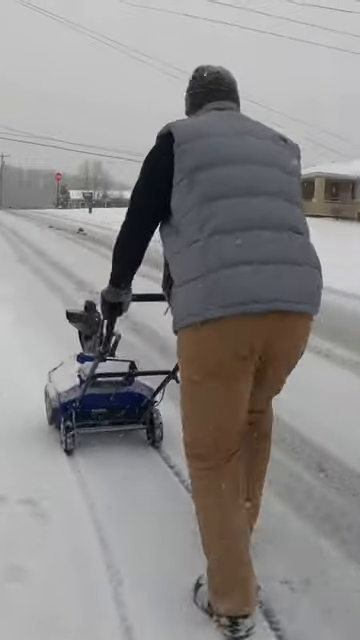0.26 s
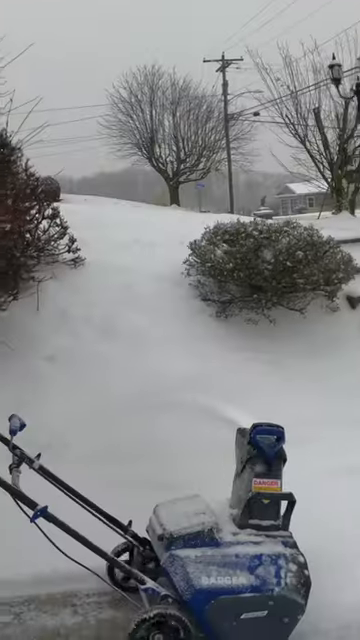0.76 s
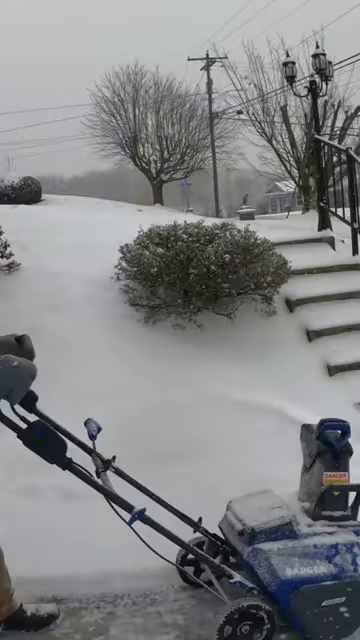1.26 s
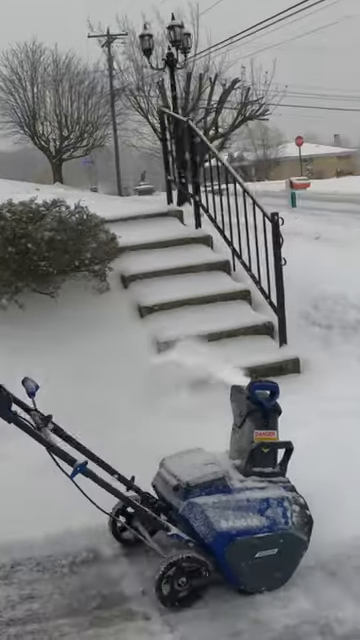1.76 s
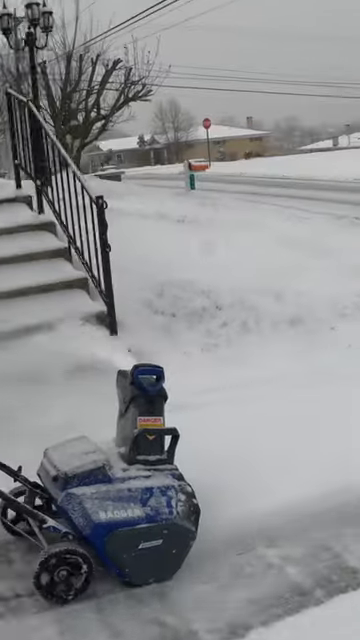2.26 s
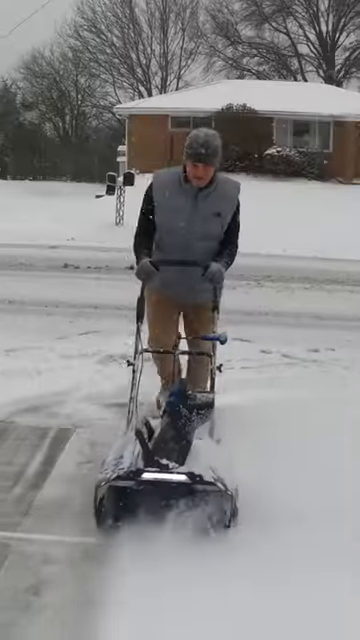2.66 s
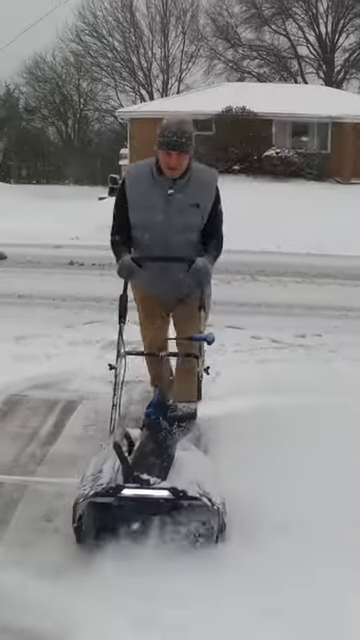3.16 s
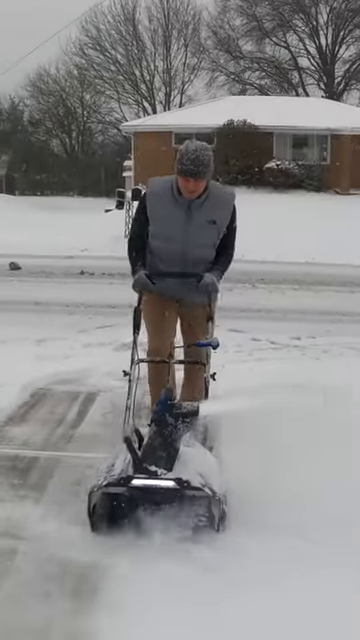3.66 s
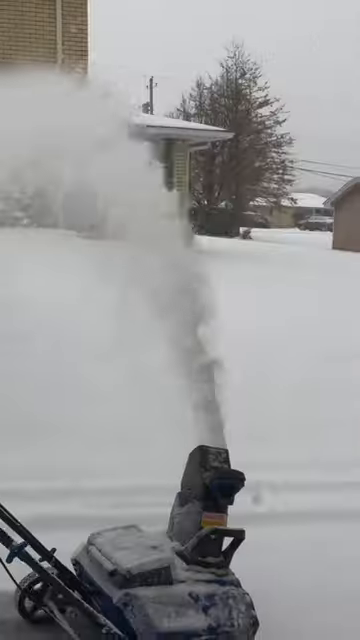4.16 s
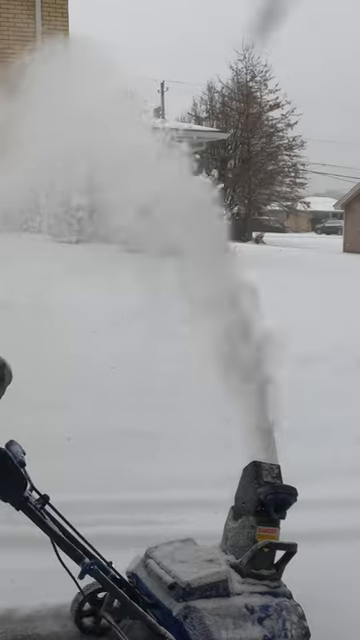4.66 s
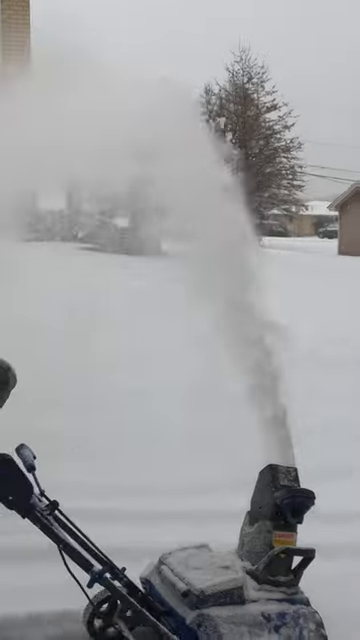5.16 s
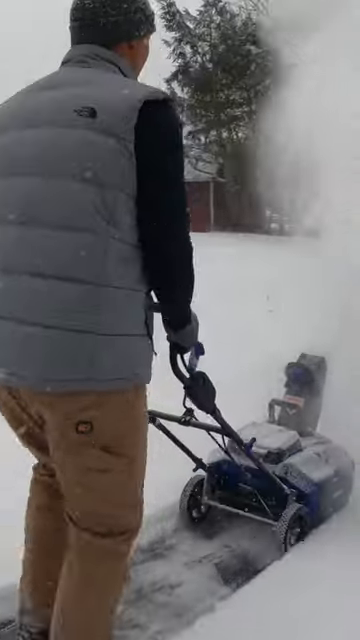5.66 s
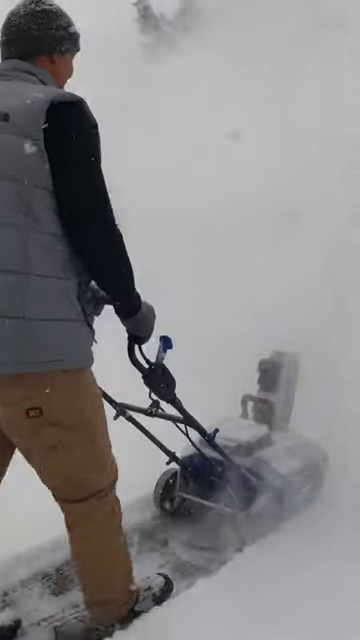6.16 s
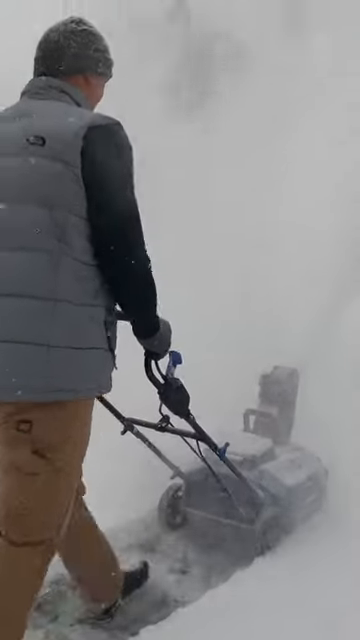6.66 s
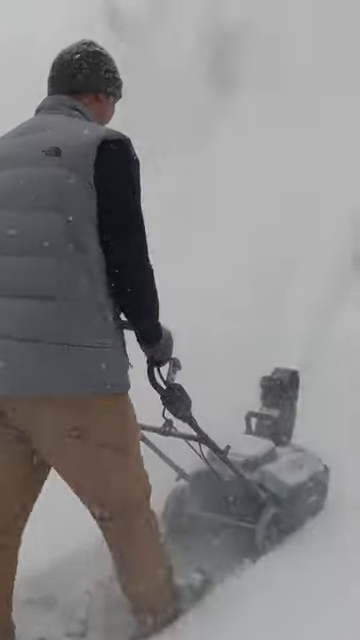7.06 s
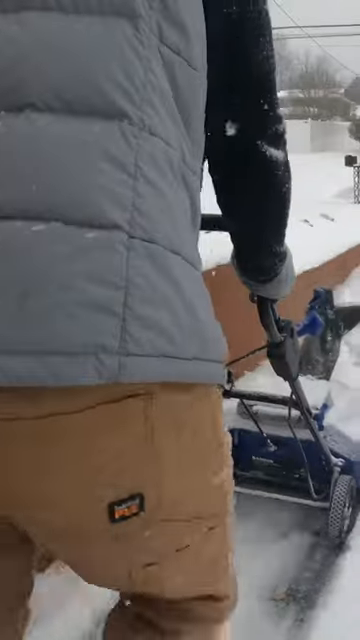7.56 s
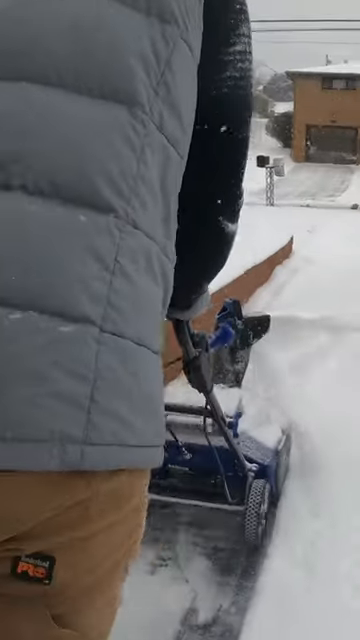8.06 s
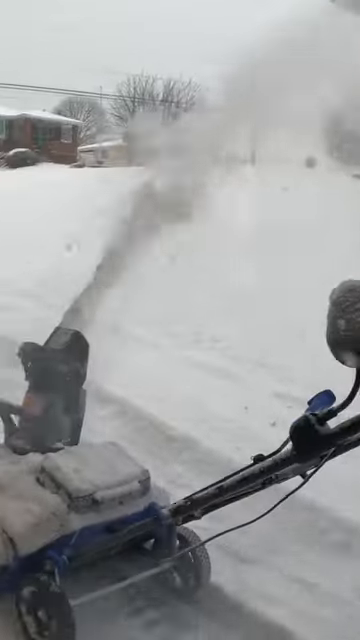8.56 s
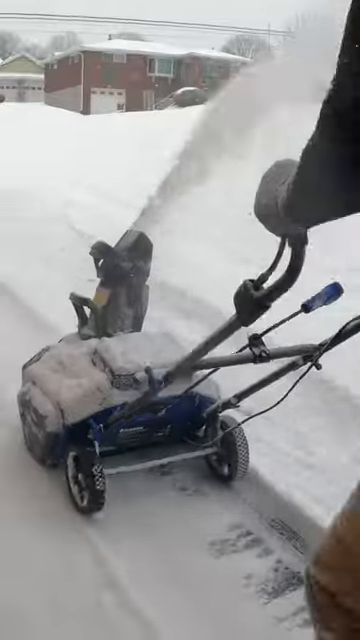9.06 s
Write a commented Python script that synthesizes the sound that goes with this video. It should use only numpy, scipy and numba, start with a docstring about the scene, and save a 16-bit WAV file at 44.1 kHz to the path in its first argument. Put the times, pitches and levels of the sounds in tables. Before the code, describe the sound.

Outdoors, close to the machine, an unpowered snow blower first rolls with gritty crunching and loose metallic clatter. After half a second its electric motor is suddenly running: a high whine, humming paddles and a broad roar of thrown snow. Scraper squeals, ice rattles and gurgles come and go. The tone jumps at each cut, with tiny dropouts.

```python
"""A snow blower with its motor off crunches and clatters along the road, then runs in seven more viewpoints.
The motor whines on shaft orders, belt-driven paddles beat and hum, and snow roars in flickering noise bands.
Blade squeals glide, clods and flecks ring through band-passes, and lumps of snow gurgle in the chute.
Each viewpoint fades in, and the sound drops out five times. Both channels are the same."""
import sys
import numpy as np
from scipy import signal
from scipy.fft import rfft, irfft, next_fast_len
from scipy.io import wavfile
from scipy.ndimage import uniform_filter1d
from numba import njit

SR = 44100
rng = np.random.default_rng(int(sys.argv[2]) if len(sys.argv) > 2 else 0)


def store_wav(level_fs):
    """Save 16-bit WAV to argv[1]."""
    pcm = np.round(np.clip(np.atleast_2d(level_fs), -1, 1) * 32767)
    wavfile.write(sys.argv[1], SR, pcm.T.astype(np.int16))


N = 411110


def undb(db):
    """Gain of a level in dB."""
    return 10 ** (np.asarray(db) / 20)


def unit(x):
    """Scale to rms 1."""
    return x / np.sqrt(np.mean(x ** 2))


def add(out, start_s, sound):
    """Mix a short sound into out from start_s."""
    out[int(start_s * SR):][:len(sound)] += sound


def columns(rows):
    """Curve rows joined by straight lines, one value a sample."""
    s, *values = np.transpose(rows)
    return [np.interp(np.arange(N) / SR, s, v) for v in values]


def walk(rate, size=N):
    """Random levels held 1 / rate s and slewed twice; spread near 1."""
    hold = max(int(SR / rate), 1)
    steps = np.repeat(rng.standard_normal(size // hold + 1), hold)
    return 1.2 * uniform_filter1d(uniform_filter1d(steps, hold), hold)[:size]


@njit
def svf(x, hz, width):
    """State-variable band-pass with a moving centre, gain 1 there."""
    y, b, l = np.empty(len(x)), 0., 0.
    for i in range(len(x)):
        g, k = np.tan(np.pi * hz[i] / SR), width / hz[i]
        v = (b + g * (x[i] - l)) / (1 + g * (g + k))
        b, l, y[i] = 2 * v - b, l + 2 * g * v, k * v
    return y


def steep(x, hz, width):
    """Three fixed band-passes in a row."""
    hz = np.full(len(x), 1. * hz)
    return svf(svf(svf(x, hz, width), hz, width), hz, width)


def band_noise(hz, width):
    """Noise through two band-passes that follow hz, rms 1."""
    return unit(svf(svf(rng.standard_normal(len(hz)), hz, 1. * width), hz, 1. * width))


def orders(turns, table, waver_db, rate):
    """Sines on multiples of a rotation, each wavering alone; rms 1 at 0 dB before the waver."""
    out = 0
    for multiple, db in table:
        level = np.sqrt(2) * undb(db + waver_db * walk(rate))
        out = out + level * np.sin(2 * np.pi * (multiple * turns + rng.random()))
    return out


def resonance_db(hz, peaks):
    """Gain of a tone at hz: 0 dB on top of the nearest resonance, falling away from it."""
    return np.max([-20 * np.log10(1 + (2 * (hz - centre_hz) / width_hz) ** 2)
                   for centre_hz, width_hz in peaks], axis=0)


# viewpoints, the first with the motor off: (start_s, fade_in_s)
VIEWS = [(0, .002), (.505, .03), (2.410, .03), (4.188, .03), (5.354, .03), (7.122, .01), (8.188, .03),
         (9.271, .03)]


def by_view(rows):
    """Curves that jump where the viewpoint changes; zero in the first view."""
    rows = np.array(rows)
    out = np.zeros((len(rows[0]) - 1, N))
    for start, _ in VIEWS[1:]:
        stop = min([s for s, _ in VIEWS if s > start] + [N / SR])
        inside = rows[(rows[:, 0] >= start) & (rows[:, 0] < stop)]
        out[:, int(start * SR):] = np.array(columns(inside))[:, int(start * SR):]
    return out


def per_view(rows):
    """One steady row for each running view."""
    return by_view([(start, *row) for (start, _), row in zip(VIEWS[1:], rows)])


# motor shaft: (start_s, turns_per_second_hz)
SPEED = [(.535, 259.6), (.7, 253.7), (.92, 261), (1.1, 260), (1.26, 265.4), (1.42, 264.6), (1.664, 274.8),
         (1.75, 262.5), (1.83, 257.6), (1.91, 261), (2.07, 278), (2.15, 278.3), (2.23, 265), (2.31, 259),
         (2.39, 259.2), (2.44, 247.6), (2.6, 246.2), (2.85, 249), (3.05, 247.6), (3.28, 250), (3.4, 261),
         (3.48, 266.5), (3.56, 266.5), (3.61, 260), (3.7, 242), (3.93, 242), (4.0, 238.5), (4.05, 240),
         (4.1, 244.5), (4.168, 250), (4.218, 247.3), (4.32, 247.5), (4.53, 250.8), (4.62, 248.4),
         (4.86, 249.8), (5.015, 247.8), (5.334, 249), (5.384, 237.9), (5.55, 244.2), (5.63, 245.5),
         (5.8, 245.8), (5.95, 248.9), (6.12, 249.8), (6.32, 247.5), (6.54, 250.2), (6.61, 248.9),
         (6.7, 243), (6.775, 242), (6.98, 249.5), (7.1, 249.7), (7.152, 246), (7.27, 244), (7.38, 243),
         (7.42, 240.6), (7.58, 241.8), (7.66, 246.2), (7.83, 243.7), (8.0, 251.3), (8.168, 245.6),
         (8.218, 252.2), (8.3, 249.6), (8.456, 247.4), (8.54, 251.3), (8.59, 246.8), (8.67, 249.8),
         (8.84, 251.2), (8.9, 245.5), (9.015, 250.8), (9.065, 245.6), (9.12, 247.8), (9.251, 250.4),
         (9.3, 253.6)]


def shaft_speed():
    """Shaft speed in Hz, its corners smoothed over a thirtieth of a second."""
    return uniform_filter1d(by_view(SPEED)[0], size=SR // 30)


# groups of motor tones: shaft multiples, then the level_db of each multiple
SLOT_ORDERS = (21, 14, 17, 56)
SLOT_DB = (2, -10, -21, -50)
POLE_ORDERS = (8, 6.76, 7)
POLE_DB = (-1.5, -11.5, -14.5)
SIDE_ORDERS = (9, 8.77)
SIDE_DB = (-4, -5.5)
# housing resonances that make an order sing out: (centre_hz, width_hz)
POLE_PEAKS = [(1980, 180)]
SIDE_PEAKS = [(2245, 42), (2420, 470)]
TENTH_PEAKS = [(2415, 100), (2550, 60)]
SECOND_PEAKS = [(484, 12), (508, 18.4), (548, 34)]
WHISTLE_PEAKS = [(9500, 310), (10125, 120)]
OVERTONE_PEAKS = [(10150, 90), (10470, 83), (11250, 900)]
OVERTONE_DB = -24  # 42nd order against the slot whine, on top of its resonance


def motor(turns, shaft_hz, slot_db, pole_db, side_db, tenth_db, second_db, whistle_db):
    """Whine on shaft orders; all but the slot group swell as they cross a resonance of the housing."""
    side_db = side_db + resonance_db(SIDE_ORDERS[0] * shaft_hz, SIDE_PEAKS)
    pole_db = pole_db + resonance_db(POLE_ORDERS[0] * shaft_hz, POLE_PEAKS)
    groups = [(side_db, zip(SIDE_ORDERS, SIDE_DB)), (pole_db, zip(POLE_ORDERS, POLE_DB))]
    lone = [(10, tenth_db, TENTH_PEAKS), (2, second_db, SECOND_PEAKS),
            (39, whistle_db, WHISTLE_PEAKS), (42, slot_db + OVERTONE_DB, OVERTONE_PEAKS)]
    for multiple, db, peaks in lone:
        groups.append((db + resonance_db(multiple * shaft_hz, peaks), [(multiple, 0)]))
    resonant = sum(undb(db) * orders(turns, table, 2.15, 45) for db, table in groups)
    return resonant + undb(slot_db) * orders(turns, zip(SLOT_ORDERS, SLOT_DB), 2.3, 35)


# multiples of the paddle beat, then the level_db of each
PADDLE_ORDERS = (4, 5, 6, 8, 9, 10, 11)
PADDLE_DB = (2, -13.5, -37, -19.5, -13, -12.5, -13)
BELT_RATIO = 2.6  # shaft turns per paddle beat


def paddles(beats, paddle_db):
    """Hum of the belt-driven paddles: wavering harmonics of their beat."""
    return undb(paddle_db) * orders(beats, zip(PADDLE_ORDERS, PADDLE_DB), 1.8, 9)


# multiples of the paddle beat in the low hum; 2.6 is the shaft itself
HUM_ORDERS = (2, 1.74, 2.6, 3)
# one row a running view: level_db of each hum order against the hiss
HUM_DB = [(-18, -21, -20.5, -13), (-18, -31.5, -15.5, -9), (-23, -28.5, -27, -24), (-30, -32.5, -34, -24.5),
          (-25, -32.5, -24, -14), (-24.5, -33, -25, -17.5), (-27, -33, -27, -26)]
HUM_WAVER_DB, HUM_WAVER_HZ = 2, 7


def hum(beats, reference_db):
    """Low hum on the paddle beat and the shaft, balanced anew in each view."""
    return orders(beats, zip(HUM_ORDERS, reference_db + per_view(HUM_DB)), HUM_WAVER_DB, HUM_WAVER_HZ)


# one curve a viewpoint, colour of the roar and hiss; the last also serves the eighth: (hz, db_per_hz)
COLOURS = [
    [(24, -56), (40, -68), (248, -14.5), (442, 3), (643, -13.5), (959, -6), (1660, -18.5), (3270, -16),
     (4410, -17), (5530, -21), (6580, -24), (8670, -24), (15800, -47)],
    [(130, -34), (180, -26), (260, -9.5), (340, -6.5), (450, -0.5), (700, -9), (820, -15), (1000, -7),
     (1250, -7.5), (1480, -14.5), (3200, -7), (5000, -12), (8000, -18.5), (13300, -39.5), (15800, -71)],
    [(130, -37), (180, -21), (340, 2.5), (450, 3.5), (600, -5.5), (680, -10.5), (750, -17), (830, -6),
     (1000, -2), (1250, -11), (1480, -23.5), (1900, -18.5), (3200, -18.5), (5000, -27.5), (8000, -34.5),
     (13300, -56.5), (15800, -73)],
    [(130, -27), (180, -13), (260, -16), (340, -2), (450, 1), (700, -3.5), (820, 2.5), (1000, -8),
     (1250, -1), (1480, -14), (3200, -8.5), (5000, -12.5), (8000, -17.5), (13300, -35.5), (15800, -52)],
    [(130, -23.5), (180, -19), (260, -5), (340, 5), (450, 8), (700, -8), (820, -1), (1000, 4.5), (1250, -6),
     (1330, -16.5), (1430, -25), (1580, -17), (1800, -16.5), (3200, -17), (5000, -18), (8000, -26),
     (13300, -44.5), (15800, -62)],
    [(130, -26), (180, -21), (340, 6), (450, -2), (700, -7.5), (820, 3), (1000, 2), (1250, -13),
     (1480, -12.5), (3200, -12.5), (5000, -11), (8000, -21.5), (13300, -40), (15800, -55)],
    [(130, -24.5), (180, -17), (340, 4), (450, 1.5), (700, -0.5), (820, 6), (1000, 4), (1250, -7),
     (1480, -14), (3200, -11), (5000, -13), (8000, -22), (13300, -42), (15800, -59)],
]
SPLIT_HZ = 1450  # about where roar and hiss overlap


def roar(low_db, high_db, beats):
    """Air and snow noise in flickering bands, coloured by viewpoint; paddle beats and random surges swell it."""
    surges = walk(14)
    beating = 1 + 0.075 * np.sin(2 * np.pi * beats)
    source = rng.standard_normal(N) * beating * undb(1.3 * walk(300))
    out = np.zeros((2, N))
    edges = [int(s * SR) for s, _ in VIEWS] + [N]
    for a, b, colour in zip(edges, edges[1:], COLOURS + COLOURS[-1:]):
        size = next_fast_len(b - a + 4096)
        octave = np.log2(np.arange(size // 2 + 1) * SR / size + 1)
        hz, db = np.transpose(colour)
        bass_cut_db = 9.8 * np.clip(np.log2(hz[0]) - octave, 0, None)
        shaped = rfft(source[a:b], size) * undb(np.interp(octave, np.log2(hz), db) - bass_cut_db)
        for centre in np.arange(5, 15):
            # overlapping triangles, an octave apart
            weight = np.clip(1 - abs(octave - centre - np.log2(SPLIT_HZ / 1448)), 0, 1)
            band = irfft(shaped * weight, size)[:b - a]
            high = int(centre > 10)
            flicker_db = 1.03 * walk(20.55, size=b - a) + (.7, 1.3)[high] * surges[a:b]
            out[high, a:b] += band * undb(flicker_db)
        out[:, a:b] /= np.sqrt(np.mean(out[:, a:b] ** 2, axis=1, keepdims=True))
    return undb(low_db) * out[0] + undb(high_db) * out[1]


# the scraper catches and squeals: (start_s, length_s, first_pitch_hz, last_pitch_hz, level_db)
SQUEALS = [(.79, 0.048, 3380, 3300, -34), (0.843, 0.056, 3290, 3330, -28.5),
           (0.983, 0.093, 3350, 3310, -34.5), (1.053, .075, 3300, 3410, -27.5),
           (1.21, 0.095, 3350, 3220, -20.5), (1.293, 0.063, 3240, 3350, -22),
           (1.361, .065, 3340, 3400, -27), (1.415, .045, 3390, 3230, -23), (1.647, .04, 3270, 3290, -28),
           (1.738, .03, 3270, 3350, -25), (1.94, 0.044, 3430, 3300, -28), (2.217, 0.037, 3300, 3310, -27),
           (2.29, .04, 3360, 3320, -33), (2.35, 0.085, 3290, 3326, -28.5), (2.465, .08, 3300, 3300, -40),
           (2.586, .13, 3330, 3250, -32), (2.713, 0.18, 3234, 3085, -31), (2.884, .1, 3100, 3170, -30.5),
           (2.981, 0.25, 3150, 3240, -32), (3.448, .12, 3080, 3060, -37), (4.134, .05, 3040, 3050, -33),
           (4.219, 0.21, 3130, 3070, -31), (5.097, 0.23, 3050, 3100, -36), (5.862, 0.072, 3220, 3040, -28),
           (5.96, 0.063, 3065, 3070, -27.5), (6.009, 0.062, 3110, 2990, -28), (6.13, .08, 2980, 3050, -31),
           (6.218, 0.079, 3065, 3126, -25), (6.282, .045, 3160, 3220, -28.5),
           (6.32, 0.108, 3194, 3166, -27), (6.421, 0.072, 3110, 3143, -25.5),
           (6.48, .055, 3115, 2960, -27.5), (6.6, 0.032, 3050, 3190, -27), (6.928, .05, 3140, 3090, -30.5),
           (6.997, .03, 3060, 3030, -34), (8.34, .05, 3030, 3070, -30), (8.39, .04, 3080, 3160, -22),
           (8.43, 0.067, 3170, 3105, -26.5), (8.565, 0.036, 3090, 3210, -23), (8.6, 0.046, 3200, 3045, -35),
           (8.72, .08, 2950, 2950, -35), (8.87, 0.055, 3080, 3250, -37), (8.915, 0.071, 3240, 3070, -29),
           (9.02, 0.036, 3140, 3150, -27), (9.09, .06, 3190, 3130, -31), (9.15, 0.052, 3110, 3060, -26)]
SQUEAL_EDGE_S, CHATTER_WANDER_HZ = 0.0305, 110.5
SQUEAL_AIR_DB, SQUEAL_WIDTH_HZ = -11, 160  # noisy part of a squeal


def squeal(chatter_db, chatter_hz):
    """Stick-slip of the scraper blade: a broken, jumping chatter, and gliding squeals when it catches."""
    t = np.arange(N) / SR
    rough = 1 + 0.00406 * walk(250)
    hz, gain = np.maximum(chatter_hz, 1000), np.zeros(N)
    for s, length, first_hz, last_hz, db in SQUEALS:
        shape = np.clip(np.minimum(t - s, s + length - t) / SQUEAL_EDGE_S + .5, 0, 1)
        level = undb(db) * shape
        # the louder squeal sets the pitch
        hz = np.where(level > gain, np.interp(t, [s, s + length], [first_hz, last_hz]), hz)
        gain = np.maximum(gain, level)
    chatter_turns = np.cumsum((chatter_hz + CHATTER_WANDER_HZ * walk(60)) * rough) / SR
    chatter = orders(chatter_turns, [(1, 0)], 3, 30)
    air = undb(SQUEAL_AIR_DB) * band_noise(hz, SQUEAL_WIDTH_HZ)
    tone = orders(np.cumsum((hz + 14 * walk(30)) * rough) / SR, [(1, -0.74)], 1.9, 50)
    return undb(chatter_db) * chatter + gain * (air + tone)


# jolts of the loose frame; both levels are relative: (start_s, crack_db, knock_db, crack_centre_hz)
CLATTERS = [(.015, -22, -42, 4400), (.044, -9.5, -38, 4450), (0.0482, -12, -31, 5000),
            (0.106, -14.5, -42, 4050), (.146, -19, -37, 5000), (.159, -24, -29, 5400),
            (0.191, -22, -31, 5200), (.2204, -31, -42, 4500), (.23, -26, -38, 4500),
            (.2534, -26, -38, 7500), (.257, -30, -25, 4000), (0.2954, -21, -32, 4250),
            (.3164, -23, -38, 5000), (0.322, -28, -27, 4240), (.341, -1.5, -36, 4300),
            (.3634, -19, -39, 7000), (.377, -6.5, -35, 7500), (0.382, -20, -14, 5500),
            (.405, -19, -42, 8000), (0.41, -5, -31, 4260), (.4254, -21, -36, 7000), (.4375, -15, -34, 8500),
            (0.442, -14, -32, 4200), (.467, -18, -38, 7500), (0.472, -23, -13.5, 4000),
            (.491, -17, -34, 6200), (0.496, -15, -36, 4500), (0.59, -5, -35, 5900),
            (7.2097, -21, -29, 4900)]
# struck resonances: (pitch_hz, level_db, t60_s)
HANDLE = [(3340, 0, 0.011), (3930, 0.5, 0.0066), (4830, -9, 0.009), (5400, -1.5, 0.008), (5950, 3, 0.0075)]
HOUSING = [(430, -7.5, 0.051), (965, 0, 0.025), (686, -4, 0.025)]
# wheel over a ridge: (start_s, level_db, first_pitch_hz, last_pitch_hz, swell_s)
THUMP = (.44, -28, 115, 165, .035)
CRACK_DB, CRACK_WIDTH_HZ, RING_BELOW_HZ = 23.5, 6600, 5200  # level against what strikes the handle
TAIL_DB, TAIL_S = -15, 0.0049  # rustle after each crack


def ring(x, modes):
    """Damped resonances struck by x."""
    out = 0
    for hz, db, t60 in modes:
        pole = np.exp(2j * np.pi * hz / SR - np.log(1000) / (t60 * SR))
        out = out + undb(db) * signal.lfilter([1], [1, -pole], x).imag
    return out


def clatters():
    """Each jolt cracks in its own colour, mostly the duller ring the handle, and knocks the housing; one thump."""
    ticks, knocks, out = np.zeros(N), np.zeros(N), np.zeros(N)
    t = np.arange(SR // 10) / SR
    for s, db, knock_db, hz in CLATTERS:
        contact = rng.standard_normal(len(t))
        decay = np.exp(-t / 0.0015) + undb(TAIL_DB) * np.exp(-t / TAIL_S)
        tick = undb(db - 48.0) * steep(unit(contact * decay), hz, 1. * CRACK_WIDTH_HZ)
        add(out, s, undb(CRACK_DB) * tick)
        add(ticks, s, tick * 2.0 / (1 + (hz / RING_BELOW_HZ) ** 6))
        add(knocks, s, undb(knock_db - 40.0) * unit(contact * np.exp(-t / 0.0032)))
    out += ring(ticks, HANDLE) + ring(knocks, HOUSING)
    s, db, first_hz, last_hz, swell = THUMP
    turns = np.cumsum(np.interp(t, [0, 2 * swell], [first_hz, last_hz])) / SR
    envelope = np.sin(np.pi * np.clip(t / swell / 2, 0, 1)) ** 2
    add(out, s, undb(db) * envelope * np.sin(2 * np.pi * turns))
    return out


# ice clods in the chute, levels before the filters: (start_s, bright_db, low_knock_db)
RATTLES = [(1.9262, -2.5, -16.5), (1.9775, 2.5, -12), (2.0173, -3, -17), (2.035, -2.5, -19),
           (2.89, -12, -4), (3.233, -3.5, -11), (3.251, -1, -15), (3.274, -1.5, -20), (3.3075, -9, -24),
           (3.4756, -15, -24), (3.4947, -12, -20), (3.5152, -15, -26), (3.5517, -12, -16),
           (3.6291, -15, -20), (3.7827, -22, -22), (3.8356, -23, -22), (3.9214, -16, -22), (3.9752, -3, -5),
           (4.0496, -15, -22), (4.07, -9, -22), (4.098, -4, -15), (4.1513, -6, -20), (4.207, -7, -20),
           (4.2594, -3, -14), (4.296, -3, -20), (4.472, -5, -1), (4.776, -24, -15), (4.9176, -2, -19),
           (5.18, -5, -17), (5.2348, -4, -9), (5.8247, 0.5, -14), (5.879, -22, -7), (7.021, -5, -15),
           (7.549, -6, -25), (7.709, -8, -14), (8.0236, -4, -14), (8.154, -13, -8), (8.46, -6, -18),
           (8.64, -10, -22), (8.653, -0.5, -20), (8.798, -11, -22), (8.8993, -8, -11), (8.957, -6, -22),
           (9.025, -1, -17), (9.0647, -3, -2), (9.2373, 1.5, -18)]
RATTLE_HZ, RATTLE_RISE_S, RATTLE_T60_S = 4030, 0.0016, 0.032
SPREAD = 1.16  # ratio by which the colour of a clod scatters


def rattles():
    """Each clod is a noise burst through a bright and a low resonance."""
    out, t = np.zeros(N + SR), np.arange(SR // 5) / SR
    for s, db, low_db in RATTLES:
        envelope = undb(-60 * t / RATTLE_T60_S) * np.clip(t / RATTLE_RISE_S, 0, 1)
        burst = rng.standard_normal(len(t)) * envelope
        bright = steep(burst, RATTLE_HZ * SPREAD ** rng.standard_normal(), 5670.0)
        add(out, s, undb(db) * bright + undb(low_db) * svf(burst, 600 + 0 * t, 540.0))
    return out[:N]


# lumps of snow in the chute: (start_s, length_s, centre_hz, level_db)
GURGLES = [(1.543, 0.041, 405, -19), (1.758, 0.07, 483, -20), (1.858, 0.051, 420, -18),
           (1.868, .04, 300, -29), (6.47, 0.029, 1170, -23), (4.301, 0.051, 806, -19),
           (4.37, 0.078, 806, -20.5), (4.451, .07, 790, -21), (4.609, 0.027, 805, -20),
           (4.642, .07, 836, -21), (4.756, 0.037, 840, -16.5), (5.089, 0.06, 778, -33),
           (5.198, .06, 825, -24), (8.197, 0.058, 1280, -30)]
GURGLE_WIDTH_HZ = 147


def gurgles():
    """Each lump swells a band of noise and lets it go."""
    out = np.zeros(N)
    for s, length, hz, db in GURGLES:
        size = int(length * SR)
        noise = band_noise(np.full(SR // 4, 1. * hz), GURGLE_WIDTH_HZ)
        add(out, s, undb(db) * noise[-size:] * np.sqrt(np.hanning(size)))
    return out


# rising chute note: (start_s, pitch_hz, level_db)
WHOOP = [(5.6, 800, -45), (5.63, 820, -23), (5.7, 925, -21), (5.75, 965, -25), (5.82, 1020, -29),
         (5.9, 1070, -34), (5.95, 1100, -55)]


def whoop():
    """A groan that slides upward: a wavering tone inside a narrow band of rushing air."""
    hz, db = columns(WHOOP)
    air = undb(-4.0) * band_noise(hz, 70.)
    tone = orders(np.cumsum(hz + 11.0 * walk(40)) / SR, [(0.96, -7.5)], 1.9, 30)
    return undb(db) * (air + tone)


# fine ice flecks ping off the chute lip: (start_s, peak_db)
FLECKS = [(2.9168, -32), (4.4273, -25), (4.7985, -31), (4.8259, -31), (5.024, -24), (5.0394, -24),
          (5.0694, -32), (5.1394, -26), (5.1574, -29), (5.2484, -21), (6.9701, -24), (8.1324, -18),
          (8.2447, -23), (8.4976, -32), (8.5914, -24), (8.7136, -27), (9.0138, -21)]
FLECK_HZ, FLECK_WIDTH_HZ, FLECK_DECAY_S = 10260, 5300, 0.006


def flecks():
    """Each fleck is a very short, very bright tick."""
    out, t = np.zeros(N + SR), np.arange(SR // 50) / SR
    for s, db in FLECKS:
        burst = rng.standard_normal(len(t)) * np.exp(-t / FLECK_DECAY_S)
        tick = steep(burst, FLECK_HZ, 1. * FLECK_WIDTH_HZ)
        add(out, s, undb(db) * tick / np.abs(tick).max())
    return out[:N]


def grit(db, per_s):
    """Sparse grains of very uneven size, each a short decaying noise tick in a bright band."""
    size_db = 3.9 * np.minimum(rng.exponential(size=N), 2.6)
    hits = (rng.random(N) < per_s / SR) * undb(size_db)
    envelope = signal.lfilter([1], [1, -np.exp(-1 / (0.0028 * SR))], hits)
    return undb(db - 1.5) * steep(envelope * rng.standard_normal(N), 4800., 5700.0)


WIND_DB = -72.5  # rms before the gusts


def wind():
    """Light gusts on the microphone, bass only."""
    return undb(WIND_DB + 1.7 * walk(3.0)) * band_noise(np.full(N, 95.), 90.)


# rolling with the motor off: (start_s, low_rumble_db, crunch_db)
ROLL = [(0.0, -32.5, -37), (0.152, -32.5, -38), (0.17, -23.5, -35), (0.178, -29, -42), (0.31, -34.5, -42),
        (0.322, -24, -30.5), (0.362, -30, -44), (0.386, -23, -35), (0.396, -28, -43), (0.482, -29.5, -36.5),
        (0.5, -29, -38)]
# the working machine: (start_s, slot_whine_db, paddle_hum_db, low_roar_db, snow_hiss_db)
LEVELS = [(.54, -38, -56, -23.5, -22.5), (.79, -35.5, -32.5, -24.5, -24.5), (1.12, -32, -28, -22.5, -23),
          (1.29, -38, -43, -22.5, -25), (1.41, -32, -24, -23, -22), (1.53, -37, -51, -22, -23),
          (1.66, -32.5, -38, -25, -23.5), (1.9, -31.5, -39, -21.5, -22), (2.03, -31.5, -40, -25, -24),
          (2.28, -35, -32, -26, -25), (2.4, -33, -56, -21.5, -23.5), (2.445, -40, -22.5, -23.5, -24.5),
          (2.7, -44, -24.5, -27.5, -25), (3.07, -47, -22, -25, -24), (3.27, -35, -20.5, -22.5, -24),
          (3.34, -41, -33, -24.5, -28), (3.44, -46, -37, -29.5, -28), (3.56, -50, -35, -28.5, -27.5),
          (3.62, -48, -23.5, -23.5, -25.5), (3.7, -44, -25.5, -25.5, -26), (3.81, -48, -30.5, -27, -25.5),
          (4.0, -43, -22.5, -23, -23.5), (4.18, -39, -28, -25, -21), (4.22, -29, -30, -22.5, -23.5),
          (4.6, -32.5, -33.5, -23, -24), (4.85, -32.5, -29, -22, -25.5), (4.97, -34, -30, -20.5, -25),
          (5.34, -32.5, -28.5, -22.5, -23.5), (5.39, -34, -28.5, -20.5, -22.5),
          (5.51, -31, -27.5, -22, -24.5), (5.64, -29, -24, -26, -24.5), (5.85, -28, -24.5, -25.5, -23.5),
          (6.13, -28.5, -30, -24.5, -26), (6.35, -33, -24.5, -26.5, -24.5),
          (6.6, -31.5, -20.5, -24.5, -25.5), (6.75, -40, -25.5, -23.5, -25),
          (6.99, -28, -22.5, -27.5, -25.5), (7.11, -34.5, -24, -25.5, -25), (7.157, -62, -57, -52, -51),
          (7.283, -50, -38, -37, -37.5), (7.41, -50, -36, -32.5, -32), (7.55, -38, -31, -30, -29.5),
          (7.8, -39, -26, -26, -28.5), (8.05, -27.5, -29, -23.5, -24.5), (8.18, -35, -23, -20.5, -22.5),
          (8.22, -29, -29, -22, -24.5), (8.4, -27.5, -25.5, -21.5, -22.5), (8.62, -29, -27.5, -21, -23.5),
          (9.0, -32, -29.5, -19, -23), (9.26, -27.5, -37, -24.5, -23.5), (9.3, -30, -55, -21, -24.5)]
# one row a running view, dB against the hiss before swells and resonances:
# (pole_db, side_db, tenth_order_db, second_order_db, order_39_db, chatter_db, chatter_pitch_hz)
VIEW_TONES = [(-8, -10.5, -8, -2.5, -16.5, -14, 3330), (-4, -9.5, -8, -8.5, -45, -28, 3180),
              (-6.5, -30, -10, -4.5, -30, -15, 3100), (-12, -21, -10, -8, -18, -17, 3120),
              (-16.5, -33, -22, -20, -25, -22, 3130), (-15, -27, -14, -20, -35, -16.5, 3400),
              (-6, -30, -30, 2.5, -35, -17, 3140)]
# added to three tone groups, end values held: (start_s, side_swell_db, pole_swell_db, hum_swell_db)
TONE_SWELLS = [(2.4, 0, -2, -5), (2.42, 3, 3.5, 1.5), (3.2, 0, 0, 0.5), (3.28, -3, -2, 0), (3.36, 6, 2, 2),
               (3.57, 6, 6, 1), (3.64, -7, 1, 3), (3.8, -5, 1, -1.5), (4.18, -5, -8, -4), (4.2, 15, 2, 5)]
DRIFT_DB, DRIFT_HZ = 1.5, 6
CRACKLE_DB, CRACKLE_PER_S = -32, 180  # crust breaking under the wheels; relative level


def scene():
    """All sources, the same in both channels."""
    shaft_hz = shaft_speed()
    turns = np.cumsum(shaft_hz * (1 + 0.002016 * walk(40))) / SR
    beats = turns / BELT_RATIO
    slot_db, paddle_db, low_db, high_db = by_view(LEVELS)
    *tones_db, chatter_hz = per_view(VIEW_TONES)
    drifting_db = [high_db + db + DRIFT_DB * walk(DRIFT_HZ) for db in tones_db]
    pole_db, side_db, tenth_db, second_db, whistle_db, chatter_db = drifting_db
    side_swell_db, pole_swell_db, hum_swell_db = columns(TONE_SWELLS)
    running = np.arange(N) >= VIEWS[1][0] * SR
    low_db, high_db = np.where(running, [low_db, high_db], columns(ROLL))
    working = motor(turns, shaft_hz, slot_db, pole_db + pole_swell_db, side_db + side_swell_db,
                    tenth_db, second_db, whistle_db)
    working = working + paddles(beats, paddle_db) + hum(beats, high_db + hum_swell_db)
    working = working + squeal(chatter_db, chatter_hz) + gurgles() + flecks() + grit(high_db, 45.)
    rolling = grit(CRACKLE_DB, CRACKLE_PER_S)
    mono = running * working + ~running * rolling + roar(low_db, high_db, beats)
    mono = mono + clatters() + rattles() + whoop() + wind()
    return np.array([mono, mono])


# the sound drops out: (from_s, to_s)
DROPOUTS = [(.593, .631), (2.534, 2.581), (5.444, 5.474), (7.228, 7.265), (8.275, 8.300)]
# treble tilt of the whole sound, a dip near 13 kHz and a lift above: (hz, level_db)
TREBLE_TILT = [(9000, -0.5), (11500, 1.5), (13300, -9.5), (15800, 7)]
TOP_HZ = 15900


def record(dry):
    """Views fade in, dropouts leave a faint dying trace, peaks round off, treble is tilted and the top cut."""
    t, gain = np.arange(N) / SR, np.ones(N)
    for s, fade in VIEWS:
        gain[t >= s] = np.clip(0.12 + (t[t >= s] - s) / fade, 0, 1)
        gain *= np.where(t < s, np.clip((s - t) / .006, .039, 1), 1)  # dip just before the view
    for a, b in DROPOUTS:
        gap = (t >= a) & (t < b)
        trace = undb(-30 - 1200 * (t[gap] - a)) * (t[gap] < b - .018)
        comeback = np.clip(1 - (b - t[gap]) / .005, 0, 1) ** 2
        gain[gap] = trace + comeback
    hz, db = np.transpose(TREBLE_TILT)
    response = undb(np.interp(np.linspace(0, SR / 2, 65), hz, db))
    taps = np.fft.fftshift(irfft(response)) * np.hanning(129)[:-1]
    sound = signal.fftconvolve(np.tanh(dry * gain), taps[None], mode="same")
    return signal.sosfilt(signal.ellip(10, .2, 80, TOP_HZ, fs=SR, output="sos"), sound)


dry = scene()
out = record(dry)
store_wav(out)
```